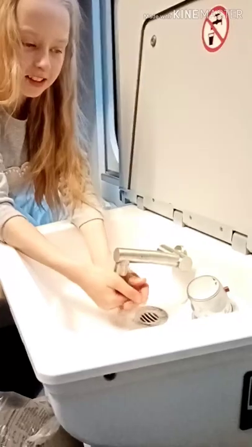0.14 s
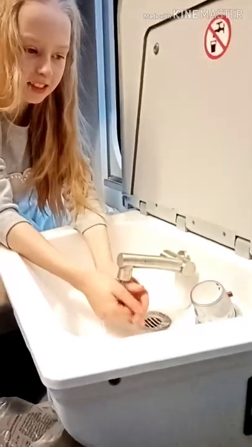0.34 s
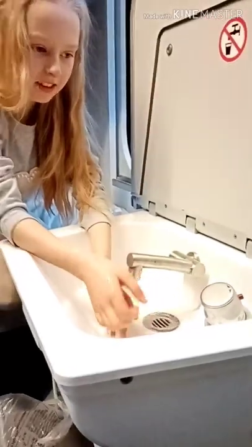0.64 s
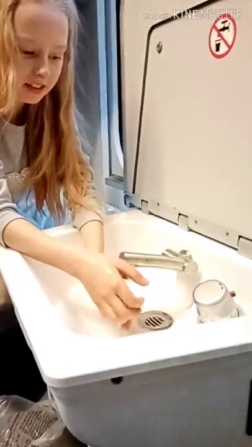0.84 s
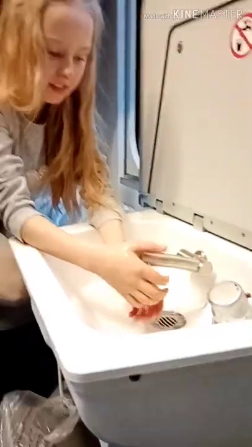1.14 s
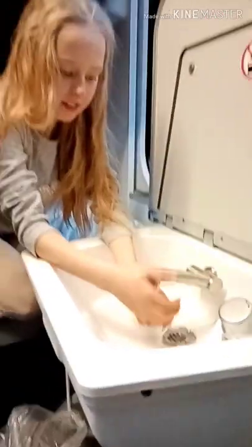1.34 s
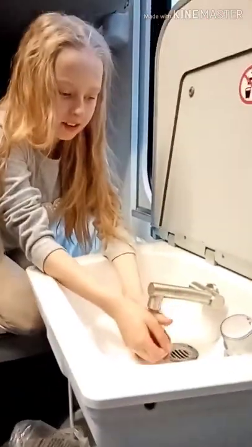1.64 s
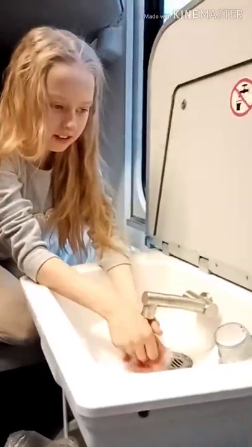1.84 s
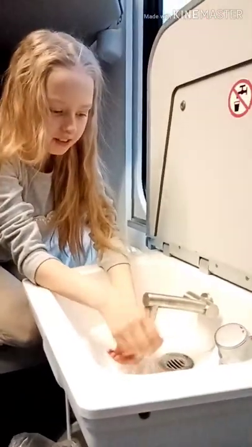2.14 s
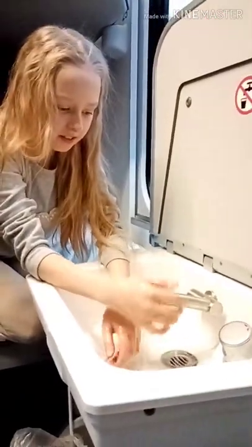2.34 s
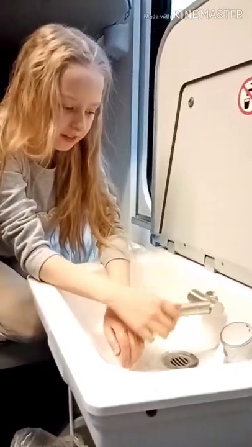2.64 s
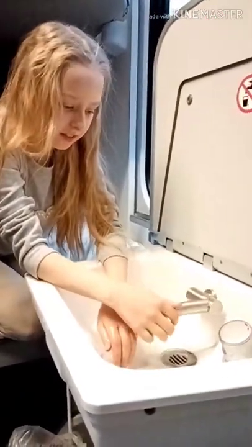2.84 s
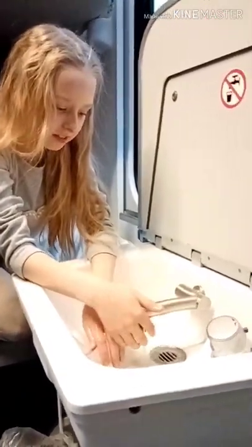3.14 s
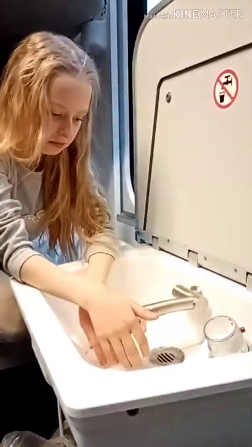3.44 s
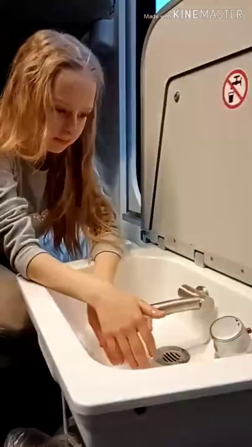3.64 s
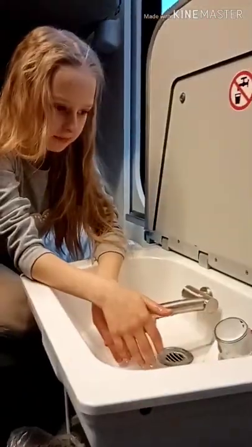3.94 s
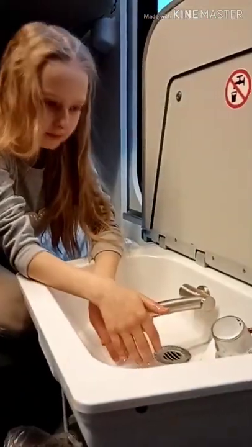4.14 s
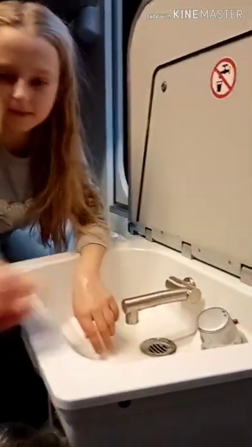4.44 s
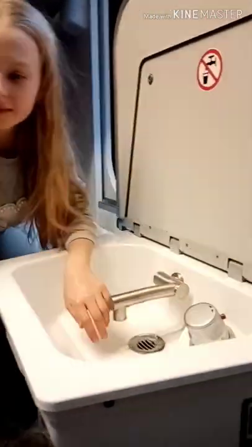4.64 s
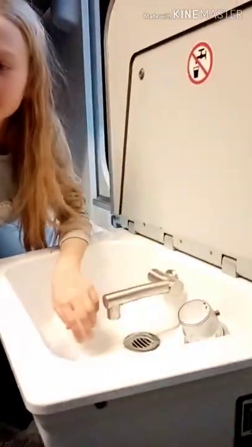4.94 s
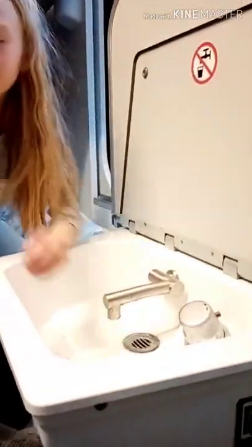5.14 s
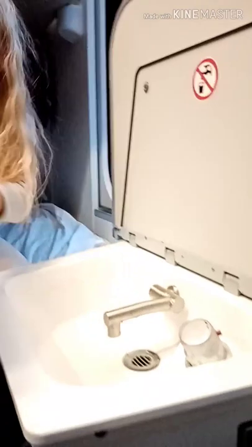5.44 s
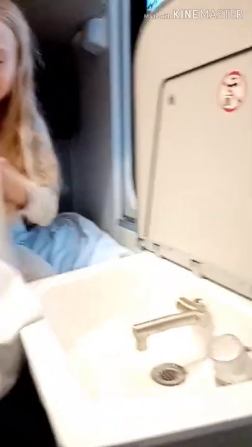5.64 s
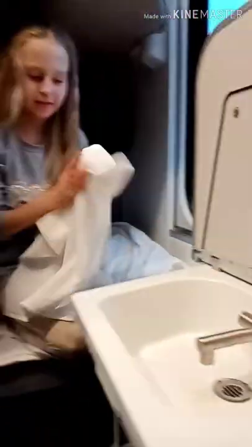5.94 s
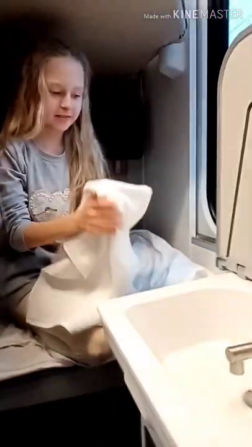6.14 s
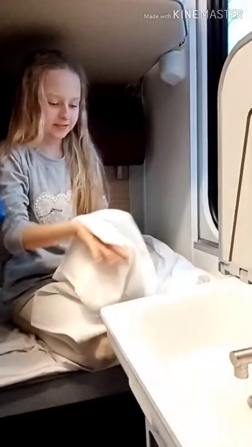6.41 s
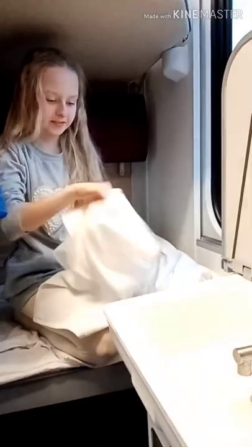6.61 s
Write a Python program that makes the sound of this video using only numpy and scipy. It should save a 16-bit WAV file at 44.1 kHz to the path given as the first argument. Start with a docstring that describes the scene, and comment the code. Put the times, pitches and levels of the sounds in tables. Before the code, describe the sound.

A close stereo pickup in a small moving train cabin. From the start, a thin tap stream breaks over rubbing hands into a plastic basin: bright, irregular patter, fizzing bubbles, short pitched gurgles and crisp slaps, strongest around 0.35 and 1.04 s. A hollow plastic knock comes at 0.4 s, with dull jolts near 0.5, 0.65 and 1.4 s. From 2.2 s the spray turns finer and hissier, with further slaps until about 3.7 s. The flow thins and ends near 4.1 s in a cluster of drips and a short dribble; single drops fall at 4.9 and 6.2 s. Sleeves rustle from 4.2 s, most strongly around 5.3 s, then a towel rubs in soft strokes to the end. Low carriage rumble and rolling noise continue throughout, with plastic knocks near 5.0 and 5.9 s, very faint sagging creaks, and heavier jolts near 6.6-6.7 s.

```python
"""Hands are rinsed under a small tap in the plastic washbasin of a moving train compartment.
The stream is random droplet impacts and ringing bubbles, with gurgles, plinks and slapping lumps of water;
it stops after about four seconds and drips out. Sleeves and a towel rustle as grains of filtered noise.
Below, the carriage rumbles and rolls as coloured noise, with jolts, hollow knocks and faint gliding squeaks.
"""
import sys
import numpy as np
from scipy import signal
from scipy.fft import rfft, irfft, next_fast_len
from scipy.io import wavfile
from scipy.ndimage import uniform_filter1d, map_coordinates

SR = 44100
rng = np.random.default_rng(int(sys.argv[2]) if len(sys.argv) > 2 else 0)


def inscribe(sig):
    """Save sig as 16-bit PCM at rate SR to the path in sys.argv[1].

    A 1-D sig is mono; a 2-D sig holds one channel per row.
    Samples are clipped to [-1, 1] before scaling.
    """
    pcm = np.round(np.clip(np.atleast_2d(sig).T, -1, 1) * 32767)
    wavfile.write(sys.argv[1], SR, pcm.astype(np.int16))


N = 298557

TIME = np.arange(N) / SR
FREQS = np.fft.rfftfreq(next_fast_len(N + 8192), 1 / SR)

# jet on the palms, before trims: start_s, spatter_db, fine_spray_db
ON_PALMS = [(0.0, -56.5, -55), (0.51, -56, -60.5), (0.9, -57, -56.5), (1.35, -60.5, -62.5),
            (1.92, -57, -64.5), (2.2, -55.5, -61)]
# jet fanned out over the wrists until the tap closes: start_s, spatter_db, fine_spray_db
ON_WRISTS = [(2.25, -56, -48.5), (2.44, -55.5, -49), (3.074, -54.5, -57.5), (3.18, -58, -58.5),
             (3.652, -56.5, -53.5), (4.054, -67, -60), (4.15, -72, -74)]
# a palm catches the jet and changes the spatter (negative = louder): start_s, length_s, loss_db
CATCHES = [(.5, 0.087, 2), (.775, 0.037, 9), (.815, 0.039, 7), (.94, 0.14, -2), (1.37, 0.13, 4),
           (2.0, 0.063, 4.5), (2.09, 0.034, 9), (2.17, 0.072, 4), (2.47, 0.11, 6), (2.71, 0.091, 6.5),
           (3.24, 0.099, 3.5), (3.48, 0.069, 4.5), (3.845, 0.053, 4), (3.93, 0.061, 11), (4.015, .06, -9)]
# lumps of water slap into the basin: start_s, peak_db, centre_hz, decay_s, width_octaves
SPLATS = [(.053, -34, 6700, .005, .6), (.127, -37, 5100, .004, .35), (.231, -36.5, 5000, .004, .2),
          (.323, -30.5, 6600, .004, .9), (.332, -35, 5000, .006, .6), (.3575, -25.5, 6300, .0015, .9),
          (.485, -38, 4600, .004, .5), (.641, -37, 9100, .003, 1), (.737, -37, 8300, .003, .5),
          (.748, -35, 9000, .003, .25), (.804, -39, 5300, .004, .3), (.89, -36.5, 8200, .003, .8),
          (.912, -31, 6500, .003, .5), (1.017, -29, 9300, .004, .35), (1.038, -24, 8800, .0026, .45),
          (1.039, -30, 7500, .001, 2), (1.07, -38, 5400, .004, .3), (1.187, -39, 5000, .004, .8),
          (1.234, -33.5, 7300, .003, .9), (1.334, -33.5, 8300, .0025, .35), (1.826, -39, 4300, .005, .3),
          (1.932, -38.5, 8100, .003, .6), (2.066, -40.5, 5700, .004, .7), (2.077, -37, 5200, .005, .4),
          (2.211, -32, 6100, .004, .8), (2.231, -36, 6000, .003, .3), (2.269, -35, 8500, .003, .25),
          (2.329, -36, 7600, .003, 1), (2.367, -32.5, 8450, .003, .2), (2.431, -27.5, 8000, .005, .6),
          (2.55, -32, 9500, .002, 1.1), (2.605, -35, 8300, .004, .5), (2.676, -33.5, 7200, .005, .25),
          (2.687, -36.5, 5500, .004, .7), (2.803, -35.5, 8500, .003, .5), (2.989, -34, 9000, .003, .5),
          (3.109, -31.5, 8400, .004, .35), (3.26, -39.5, 5400, .004, .3), (3.348, -37, 5300, .004, .5),
          (3.462, -37.5, 8400, .003, .5), (3.546, -28, 15000, .0018, .15), (3.587, -35.5, 8700, .004, .35),
          (3.69, -33, 8000, .0037, .7), (3.743, -37, 9000, .003, .6), (3.836, -41, 5600, .005, .35),
          (3.85, -42, 9600, .003, .5), (3.893, -40, 7900, .002, 1.4), (3.913, -43, 8500, .008, .6),
          (3.978, -42, 4700, .008, .9)]
# fine spray, also the crisp part of the cloth: freq_hz, level_db
SPRAY_COLOUR = [(11000, -19.5), (13800, -11), (14600, -0.5), (15400, 3.5), (16500, -20)]
# microphone colouring of short wet ticks, dip near 12.5 kHz, resonance at 15 kHz: freq_hz, level_db
MIC_TICK_COLOUR = [(2000, -38), (3500, -22), (9000, -22), (12500, -30), (14200, -17), (15000, -7),
                   (16500, -22)]


def from_db(db):
    """Decibels to gain."""
    return 10 ** (np.asarray(db) / 20)


def rms_one(x):
    """Scale so that the mean of the channels has rms 1."""
    return x / np.sqrt(np.mean(x.mean(axis=0) ** 2) + 1e-20)


def gains(rows):
    """The dB columns of a time curve as gains per sample."""
    times_s, *columns = np.transpose(rows)
    return [from_db(np.interp(TIME, times_s, column)) for column in columns]


def response(points, peaks=()):
    """A curve interpolated on a log-frequency axis, with resonances on top."""
    hz, value = np.transpose(points)
    curve = np.interp(np.log(FREQS + 1), np.log(hz), value)
    return curve + sum(db / (1 + (2 * (FREQS - f) / width) ** 2) for f, width, db in peaks)


def resampled(curve, size):
    """Pick the points of a response that suit a transform of this size."""
    return curve[..., np.linspace(0, len(FREQS) - 1, size // 2 + 1).astype(int)]


def filtered(x, gain):
    """Apply a zero-phase frequency response to a sound of any length."""
    size = next_fast_len(x.shape[-1] + 8192)
    return irfft(rfft(x, size) * resampled(gain, size), size)[..., :x.shape[-1]]


def rung(x, db):
    """Filter with minimum phase, so that resonances ring only after the blow."""
    size = 2 * next_fast_len(x.shape[-1])
    cepstrum = irfft(np.log(from_db(resampled(db, size))))
    lag = np.arange(size)
    fold = np.sign(lag) + np.sign(size // 2 - lag)  # moves the cepstrum to positive lags
    return irfft(rfft(x, size) * np.exp(rfft(cepstrum * fold)), size)[..., :x.shape[-1]]


def coloured(x, points, peaks=()):
    """Filter a sound by a spectrum; rms 1."""
    return rms_one(filtered(x, from_db(response(points, peaks))))


def drift(rate_hz):
    """Random curve: straight lines between normal draws of spread 1."""
    knots = rng.standard_normal(8192)
    return np.interp(TIME * rate_hz, np.arange(len(knots)), knots)


def swell(start_s, length_s):
    """One movement: a half-sine arch from 0 up to 1 and back."""
    return np.sin(np.pi * np.clip((TIME - start_s) / length_s, 0, 1))


def swells(rows):
    """Sum of arches given as start_s, length_s, height."""
    return sum(height * swell(s, length) for s, length, height in rows)


def add(out, start_s, sound, peak_db):
    """Mix a short sound in at a time, with a peak level averaged over its channels."""
    at = int(start_s * SR)
    level = from_db(peak_db) / np.abs(sound).max(axis=1).mean()
    out[:, at:at + sound.shape[1]] += (level * sound)[:, :N - at]


def grains(per_s, spread_db):
    """Random tiny impacts, most small and a few large."""
    sizes = from_db(spread_db * np.minimum(rng.exponential(1, N), 4.5))
    signs = rng.choice([-1, 1], N)
    return sizes * signs * (rng.random(N) < per_s / SR)


def lumps(per_s=90, decay_s=.006, trickle=.5):
    """Each random start sets off a flurry at once, which then dies away; rms 1."""
    starts = np.abs(grains(per_s, 0.42))
    flurry = signal.lfilter([1], [1, -np.exp(-1 / (decay_s * SR))], starts)
    strength = trickle + flurry / flurry.mean()
    return strength / np.sqrt(np.mean(strength ** 2))


def bubbles(per_s, centre_hz, octaves, cycles, spread_db, rise=0.066):
    """Trapped air rings, each bubble at its own pitch, falling 60 dB in `cycles` and rising in pitch."""
    onset_cycles = 5
    born = grains(per_s, spread_db)
    at, age = np.flatnonzero(born)[:, None], np.arange(SR // 50)
    scatter = 2 ** (octaves * rng.standard_normal(at.shape))
    hz = np.minimum((centre_hz * np.ones(N))[at] * scatter, SR / 3)
    turns = hz * age / SR
    envelope = np.minimum(turns / onset_cycles, 1) * from_db(-60 * turns / cycles)
    rings = born[at] * envelope * np.sin(2 * np.pi * turns * (1 + rise * turns / cycles))
    return np.bincount((at + age).ravel(), rings.ravel(), N)[:N]


def echoes(bowl_s):
    """Random paths from one spot to two microphones: bowl reflections plus a weaker cabin tail."""
    cabin_db, cabin_s = -7.0, .022
    t = TIME[:SR // 12]
    decays_s = np.array([bowl_s, cabin_s])[:, None, None]
    bowl, cabin = rng.standard_normal((2, 2, len(t))) * np.exp(-t / decays_s)
    bowl /= np.linalg.norm(bowl, axis=1, keepdims=True)
    cabin /= np.linalg.norm(cabin, axis=1, keepdims=True)
    return bowl + from_db(cabin_db) * cabin


def basin(x, bowl_s=0.021, count=8):
    """The sound hops between spots every 64 samples, each spot with echoes of its own."""
    spot = np.repeat(rng.integers(0, count, N // 64 + 1), 64)[:N]
    return sum(signal.oaconvolve((x * (spot == k))[None], echoes(bowl_s))[:, :N] for k in range(count))


def wandering(x, share, rate_hz):
    """All resonances slide up and down together, by a share of their pitch, through a varying time base."""
    slide = drift(rate_hz)
    place = np.cumsum(1 + share * (slide - slide.mean()))
    return np.array([map_coordinates(side, [place], order=3, mode="mirror") for side in x])


def burst(decay_s, rise_s=0.00022, tail_db=-14.0, tail_s=0.051):
    """A puff of noise that rises and dies, with a fainter tail."""
    t = TIME[:SR // 6]
    attack = np.minimum(t / max(rise_s, .0001), 1) ** 2
    age = np.maximum(t - rise_s, 0)
    fall = np.exp(-age / max(decay_s, .0004)) + from_db(tail_db) * np.exp(-age / tail_s)
    return rng.standard_normal((2, len(t))) * attack * fall


def ring(clicks, hz, t60_s):
    """A unit click sets a decaying sine ringing."""
    r, w = from_db(-60 / (t60_s * SR)), 2 * np.pi * hz / SR
    return signal.lfilter([0, np.sin(w)], [1, -2 * r * np.cos(w), r * r], clicks + 1e-18)


def tick(hz, decay_s, octaves, bubble_share, mic_db):
    """A wet contact: a noise band some octaves wide, a damped bubble ringing in it, microphone colouring."""
    edges_hz = [hz * 2 ** (-octaves / 2), min(hz * 2 ** (octaves / 2), .45 * SR)]
    slap = burst(decay_s, rise_s=.0018, tail_db=-27.0, tail_s=.014)[:, :SR // 16]
    contact = signal.sosfilt(signal.butter(2, edges_hz, "band", fs=SR, output="sos"), slap)
    return contact + bubble_share * ring(contact, hz, t60_s=.011) + rung(slap, mic_db)


def running():
    """1 while the tap runs, falling to 0 as the spout empties."""
    dry_s, drain_s = 4.1, 0.3
    return np.clip((dry_s - TIME) / drain_s, 0, 1)


def stream(fizz_db=0.5, spatter_trim_db=2.96, spray_trim_db=0.5, sway_db=-0.4, spray_follows=0.37):
    """Droplets patter and bubbles fizz in uneven flurries as the hands break the jet."""
    # freq_hz, level_db
    spatter_colour = [(400, 7.5), (900, -20), (1250, -30), (2000, -40), (2900, -12.5), (3500, 0.5),
                      (4100, -3.5), (5100, 6), (5900, -2), (7400, 0.5), (8800, 8), (10200, -2), (12500, -2),
                      (14000, -15.5)]
    # ringing of the water film and drain: freq_hz, width_hz, gain_db
    basin_peaks = [(4945, 45, 5.5), (5340, 43, 7.5), (6440, 210, 7.5)]
    # gathered water spills from the hands (negative = quieter): start_s, length_s, rise_db
    spills = [(.02, 0.058, 3.5), (.33, 0.14, 2), (.845, 0.04, 4), (1.61, 0.052, 6.5), (2.055, 0.04, -2.5),
              (2.57, 0.053, 5), (2.79, 0.11, 3), (3.08, 0.13, 2), (3.38, 0.069, 4.5), (3.903, 0.029, 11)]
    # the jet glances off a knuckle into fine spray: start_s, length_s, rise_db
    glances = [(.6, 0.14, 10.5), (.92, 0.14, 0), (1.385, 0.055, 6)]
    gather_s, gather_loss_db = 0.044, 0.5  # the spatter thins while a lump gathers in the hands

    spatter, spray = gains(ON_PALMS + ON_WRISTS)
    gathering_db = swells((s - 0.82 * gather_s, gather_s, gather_loss_db) for s, *_ in SPLATS)
    hands_db = swells(spills) - swells(CATCHES) - gathering_db
    surge = np.sqrt(lumps()) * from_db(sway_db * drift(28.48))

    impacts = rms_one(basin(grains(7000, 2.5) * surge, bowl_s=0.001, count=12))
    fizzing = bubbles(450, 6500, octaves=0.5, cycles=257, spread_db=0.0) * surge
    fizz = rms_one(basin(fizzing, bowl_s=0.028, count=5))
    film = coloured(impacts + from_db(fizz_db) * fizz, spatter_colour, basin_peaks)
    film = wandering(film, share=.013, rate_hz=28)
    mist = coloured(impacts * from_db(2.0 * drift(45)), SPRAY_COLOUR)

    spray_db = spray_trim_db + spray_follows * hands_db + swells(glances)
    water = from_db(spatter_trim_db + hands_db) * spatter * film + from_db(spray_db) * spray * mist
    return water * running()


def gurgles(trim_db=-7.0, octaves=0.223, cycles=80):
    """Bubbles ring around the pitch of each air pocket, which glides as the hands squeeze or open it."""
    # air pockets between cupped hands, before the trim: start_s, length_s, first_hz, last_hz, level_db
    pockets = [(0, 0.24, 3350, 2760, -55), (0.245, 0.33, 3980, 4100, -53), (0.57, 0.088, 3800, 3600, -54.5),
               (0.848, 0.092, 3300, 3700, -54.5), (1.127, 0.21, 3840, 3920, -59.5),
               (1.424, 0.061, 2450, 2370, -58.5), (1.608, 0.055, 3500, 3460, -57),
               (1.722, 0.23, 4770, 2670, -50.5), (1.925, 0.32, 3590, 4040, -57),
               (2.552, 0.071, 4230, 4130, -70.5), (2.756, 0.205, 2860, 3010, -55.5),
               (2.87, 0.44, 3190, 3130, -57.5), (3.166, 0.5, 3520, 3300, -61.5),
               (3.578, 0.31, 2830, 2740, -55.5), (3.815, 0.21, 3020, 4400, -61.5)]
    path = []
    for s, length, first_hz, last_hz, _ in pockets:
        path += [(s + .1 * length, first_hz), (s + .9 * length, last_hz)]
    pocket_hz = np.interp(TIME, *np.transpose(sorted(path)))
    hollow = basin(bubbles(300, pocket_hz, octaves=octaves, cycles=cycles, spread_db=0.0), count=3)
    level = swells((s, length, from_db(db + trim_db)) for s, length, _, _, db in pockets)
    return level * rms_one(hollow)


def droplets(plink_db=-11, spit_db=-4.5):
    """Drops plink in the water on the basin floor and spit off the skin; the last dribble on after the jet."""
    # hands and spout dribble as the tap closes: start_s, length_s, level_db before the fade
    dribble_span = (3.8, .72, -64.5)
    start_s, length_s, dribble_db = dribble_span
    spatter, _ = gains(ON_PALMS + ON_WRISTS)
    plinks = rms_one(basin(bubbles(110, 3900, octaves=.45, cycles=110, spread_db=2.5), count=3))
    spits = bubbles(120, 7800, octaves=.33, cycles=75, spread_db=1.1)
    spits = rms_one(basin(spits, bowl_s=.0012, count=6))
    dribble = bubbles(520, 6300, octaves=.55, cycles=50, spread_db=0.8)
    dribble = rms_one(basin(dribble, bowl_s=.006, count=3))

    free = spatter * running() * from_db(-swells(CATCHES))
    dying = np.clip((start_s + length_s - TIME) / length_s, 0, 1)
    falling = free * (from_db(plink_db) * plinks + from_db(spit_db) * spits)
    return falling + from_db(dribble_db) * swell(start_s, length_s) * dying * dribble


def diffuse():
    """Noise that fills the cabin: alike at both microphones in the bass, unrelated in the treble."""
    # correlation of the two microphones: freq_hz, likeness (0 to 1)
    likeness = [(60, .99), (150, .98), (300, .92), (500, .65), (900, .5), (1500, .2), (4000, .05)]
    alike = np.clip(response(likeness), 0, 1)
    mid, side = rng.standard_normal((2, N))
    return filtered(mid, np.sqrt(1 + alike)) + filtered(side, np.sqrt(1 - alike)) * [[1], [-1]]


def train(roll_trim_db=-1.5, jolt_hz=76, jolt_s=.015, rattle_s=0.094, steadiness=0.53, left_lead_s=.00088):
    """The wheels shake the carriage panels; the sound reaches the left microphone first."""
    # ride levels before trims: time_s, rumble_db, rolling_noise_db
    ride = [(0.0, -44.5, -52), (0.24, -43, -52.5), (6.77, -43, -53)]
    # rough stretches of track (negative = quieter): start_s, length_s, rumble_rise_db, roll_rise_db
    rough_track = [(0.03, 1.34, 2.5, 4), (0.44, 0.45, 5, -4), (1.562, 0.31, -2, 1.5), (3.64, 0.13, 3, 6),
                   (4.933, 1.1, 2, 0), (6.34, 0.56, 2.5, 1.5)]
    # freq_hz, level_db
    rumble_colour = [(20, -32), (32, -54), (42, -15), (54, 0), (80, 0), (96, -7.5), (125, -8), (165, -10),
                     (200, -25), (300, -69)]
    # freq_hz, level_db
    roll_colour = [(120, -5), (200, -1), (290, -1.5), (400, -5.5), (620, -10), (1000, -29), (1300, -24.5),
                   (2200, -27), (4000, -67), (15000, -31)]
    # panel resonances: freq_hz, width_hz, gain_db
    carriage_peaks = [(74.6, 40, 4.5), (113, 18, 11), (222.2, 18.5, 8.5), (276, 7.3, 4), (362.4, 38, 4.5),
                      (551, 3.4, 12.5), (810, 44, 1.5), (893, 95, 8), (983, 33, 5.5), (1626, 12, 12)]
    # the wheels jolt the carriage and its fittings rattle: time_s, thud_peak_db, rattle_peak_db
    jolt_rows = [(0.515, -28.5, -59), (0.653, -32.5, -41), (0.736, -35, -40.5), (1.381, -33, -58),
                 (2.32, -33.5, -46), (3.217, -36.5, -56), (6.563, -34, -47), (6.704, -28, -53)]

    rumble, roll = gains(ride)
    rumble = rumble * from_db(swells((s, length, db) for s, length, db, _ in rough_track))
    roll = roll * from_db(swells((s, length, db) for s, length, _, db in rough_track))
    shake = coloured(diffuse(), rumble_colour, carriage_peaks)
    power = uniform_filter1d(shake[0] ** 2 + 1e-6, size=SR // 10)
    shake = rms_one(shake / power ** (steadiness / 2))  # partly evens out the level
    rolling = coloured(diffuse(), roll_colour, carriage_peaks)

    jolts, t = np.zeros((2, N)), TIME[None, :SR // 4]
    for s, thud_db, rattle_db in jolt_rows:
        thud = t * np.exp(-t / jolt_s) * np.sin(2 * np.pi * jolt_hz * t)
        rattle = filtered(burst(rattle_s)[:1], from_db(response(roll_colour)))
        add(jolts, s - jolt_s / 2, thud, thud_db)
        add(jolts, s - jolt_s / 2, rattle, rattle_db)
    left, right = rumble * shake + from_db(roll_trim_db) * roll * rolling + jolts
    return np.array([left, np.interp(TIME - left_lead_s, TIME, right)])


def splats(bubble_share=.05):
    """Larger lumps slap on skin and basin as bursts of noise, some broad and some with a clear pitch."""
    out, mic_db = np.zeros((2, N)), response(MIC_TICK_COLOUR)
    for s, db, hz, decay_s, octaves in SPLATS:
        add(out, s, tick(hz, decay_s, octaves, bubble_share, mic_db), db)
    return out


def knocks(body_q=2.3, hollow_db=15.0, chatter_db=2.5):
    """Damped plastic is bumped and chatters briefly: a broad hollow thud with a shorter bright crack."""
    # bumps on the plastic fittings: start_s, body_peak_db, crack_peak_db, rise_s, decay_s, body_hz
    bumps = [(.399, -33.5, -32.5, .004, .018, 930), (.412, -41, -42, .003, .014, 1450),
             (1.447, -56, -48, .003, .016, 900), (3.6455, -47, -45, .002, .018, 1000),
             (3.675, -51, -53, .002, .008, 1350), (3.69, -50, -48, .001, .004, 1300),
             (3.701, -49.5, -53, .004, .012, 1150), (4.555, -55, -49, .001, .012, 870),
             (4.9895, -43, -42.5, .002, .02, 1000), (5.444, -51, -54, .001, .006, 1350),
             (5.612, -55, -57, .003, .012, 1500), (5.93, -43.5, -45, .0015, .006, 1700),
             (5.938, -47, -45, .002, .016, 680), (6.649, -54, -53, .002, .028, 1400)]
    # freq_hz, level_db
    body_colour = [(250, -11), (600, -2.5), (900, 0.5), (1500, -3), (2200, 0), (3000, -11), (5000, -49.5)]
    # freq_hz, level_db
    crack_colour = [(1000, -4.5), (2100, 0), (2700, -6.5), (4100, 2), (6000, -3), (9000, -12), (15000, -45)]
    # modes of the plastic: freq_hz, width_hz, gain_db
    plastic_modes = [(1530, 150, 0.5), (2150, 140, 4), (3300, 130, 16.5), (4050, 78, 10), (5100, 130, 6),
                     (5470, 200, 5), (6940, 340, 8)]
    out = np.zeros((2, N))
    for s, body_db, crack_db, rise_s, decay_s, hz in bumps:
        chatter = from_db(chatter_db * drift(340)[:SR // 6])
        body = response(body_colour, plastic_modes + [(hz, hz / body_q, hollow_db)])
        crack = response(crack_colour, plastic_modes)
        add(out, s, rung(chatter * burst(decay_s, rise_s), body), body_db)
        add(out, s, rung(chatter * burst(0.64 * decay_s, rise_s), crack), crack_db)
    return out


def squeaks(waver=0.012):
    """Fittings creak faintly: soft, nearly pure tones that swell, sag in pitch and fade."""
    # start_s, length_s, pitch_hz, peak_db, glide_octaves_per_s
    creaks = [(1.016, 0.096, 440, -56, -0.66), (3.06, 0.27, 475, -61.5, -0.56),
              (4.11, 0.047, 860, -64, -0.12), (6.149, 0.09, 770, -58, -0.15)]
    out, t = np.zeros((2, N)), TIME[:SR // 3]
    for s, length, hz, db, glide in creaks:
        pitch_hz = hz * 2 ** (glide * t) * (1 + waver * drift(160)[:len(t)])
        arch = np.sin(np.pi * np.minimum(t / length, 1))
        tone = np.sin(2 * np.pi * np.cumsum(pitch_hz) / SR)
        add(out, s, (arch * tone)[None], db)
    return out


def drips(tick_s=0.002, octaves=.55, bubble_share=.13, rebound_s=.026, rebound_loss_db=10, count=2):
    """Each drop plops on a wet surface and throws up smaller droplets that land just after it."""
    # single drops: start_s, peak_db, pitch_hz
    drops = [(3.954, -52, 4700), (3.989, -48, 7500), (4.003, -45, 5900), (4.043, -48.5, 5140),
             (4.087, -41, 8300), (4.145, -43.5, 6600), (4.2025, -41, 5620), (4.203, -39.5, 8530),
             (4.217, -51, 6500), (4.228, -57, 7700), (4.301, -52, 7700), (4.339, -50, 8700),
             (4.515, -52, 3560), (4.556, -46, 5800), (4.895, -41, 6900), (6.242, -39, 8960)]
    out, mic_db = np.zeros((2, N)), response(MIC_TICK_COLOUR)
    for s, db, hz in drops:
        add(out, s, tick(hz, tick_s, octaves, bubble_share, mic_db), db)
        for late, shift_octaves in rng.uniform([.2, -.4], [1, .4], (count, 2)):
            rebound = tick(hz * 2 ** shift_octaves, tick_s, octaves, bubble_share, mic_db)
            add(out, s + late * rebound_s, rebound, db - rebound_loss_db * (1 + late))
    return out


def patchy(x, depth_db, rate_hz, count=14):
    """Each narrow band swells and fades on its own."""
    place = np.interp(np.log(FREQS + 1), np.log([1200, 16000]), [0, count - 1])
    size = next_fast_len(N + 8192)
    spectrum = rfft(x, size)
    out = 0
    for k in range(count):
        band = irfft(spectrum * np.maximum(1 - np.abs(place - k), 0), size)[:, :N]
        out = out + band * from_db(depth_db * drift(rate_hz))
    return out


def cloth(crisp_trim_db=2.5, sway_db=-1.5, grain_db=2.6, pressure_db=.7):
    """Fibres catch and slip in runs; the rustle swells with each stroke and shifts colour with the folds."""
    # strokes of sleeves and towel, before trims: start_s, length_s, rub_db, crisp_db
    strokes = [(4.233, 0.2, -72, -73), (4.376, 0.24, -68.5, -69), (4.533, 0.5, -64.5, -65.5),
               (4.93, 0.3, -62.5, -65), (5.155, 0.32, -58.5, -61), (5.323, 0.13, -84, -79),
               (5.516, 0.24, -67, -77), (5.668, .06, -68.5, -79), (5.743, 0.28, -68.5, -72),
               (5.883, 0.079, -68, -80), (5.997, 0.21, -64.5, -75), (6.197, 0.14, -62, -73),
               (6.363, .17, -63.5, -76), (6.403, 0.08, -67.5, -70), (6.575, .15, -68, -86)]
    # the cloth keeps stirring between strokes: start_s, length_s, level_db
    stir_span = (4.59, 2.43, -71.5)
    # freq_hz, level_db
    cloth_colour = [(600, -36), (1500, -2.5), (2400, -6.5), (3300, -2), (4700, -3), (6500, 4.5), (7800, -1),
                    (9000, 3), (10300, -8.5), (13000, -10.5), (14000, -38)]

    start_s, length_s, stir_db = stir_span
    stir = from_db(stir_db) * np.sqrt(swell(start_s, length_s))
    rub = np.hypot(swells((s, span, from_db(db)) for s, span, db, _ in strokes), stir)
    crisp = swells((s, span, from_db(db + crisp_trim_db)) for s, span, _, db in strokes)
    slips = np.sqrt(lumps(per_s=260, decay_s=.003, trickle=1))
    fibres = np.array([grains(9000, grain_db) for side in range(2)])
    fibres = fibres * slips * from_db(sway_db * drift(55))
    rustle = coloured(patchy(fibres, depth_db=3.6, rate_hz=25), cloth_colour)
    rustle = wandering(rustle, share=.06, rate_hz=14)
    pressure = from_db(pressure_db * drift(32))  # uneven pressure of the hands
    return pressure * (rub * rustle + crisp * coloured(fibres, SPRAY_COLOUR))


def scene():
    """Water, hands and cloth over the ride."""
    water = stream() + gurgles() + droplets() + splats() + drips()
    return water + train() + knocks() + squeaks() + cloth()


def record(dry, cutoff_hz=15600):
    """Two microphones, the left one shaded and dull; the top is cut."""
    # freq_hz, left_minus_right_db
    left_colour = [(100, -2.5), (280, -6), (450, -2), (740, 0), (2000, -1.5), (3500, -3.5), (5500, -8),
                   (8000, -11), (9500, -9), (11000, -8), (13000, -35), (15000, -27)]
    left = from_db(response(left_colour))
    balance = np.sqrt(2 / (1 + left ** 2))  # keeps the summed power of the two channels
    heard = filtered(dry, np.array([left, np.ones_like(left)]) * balance)
    return signal.sosfilt(signal.ellip(12, .2, 80, cutoff_hz, fs=SR, output="sos"), heard)


dry = scene()
out = record(dry)
inscribe(out)
```